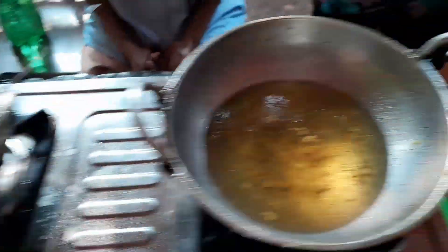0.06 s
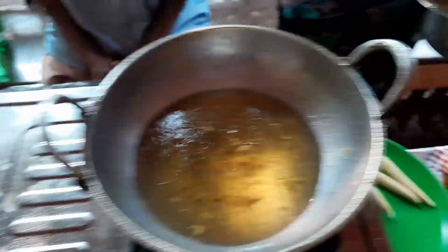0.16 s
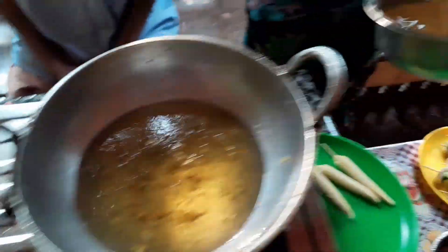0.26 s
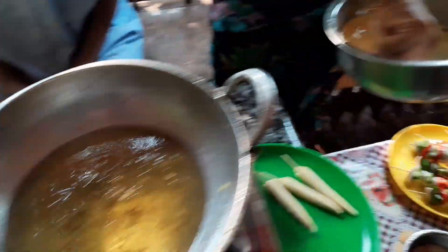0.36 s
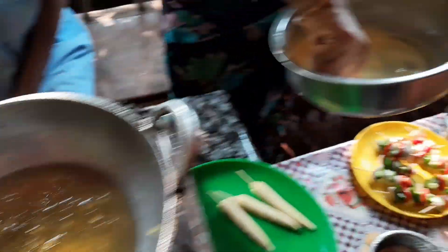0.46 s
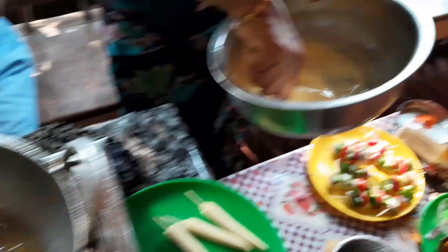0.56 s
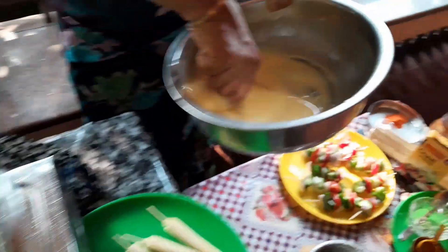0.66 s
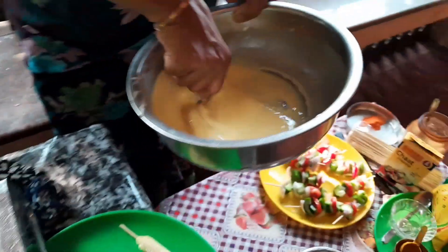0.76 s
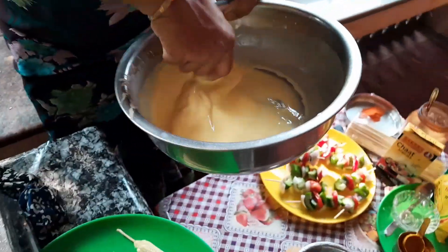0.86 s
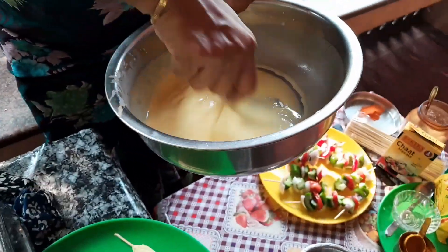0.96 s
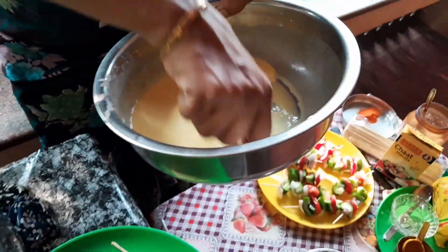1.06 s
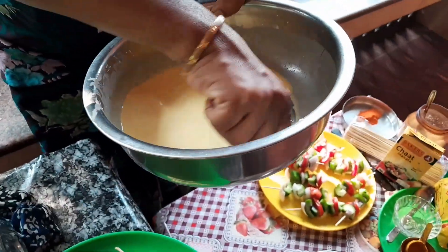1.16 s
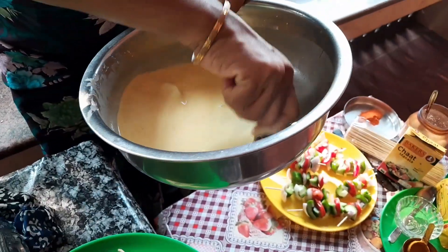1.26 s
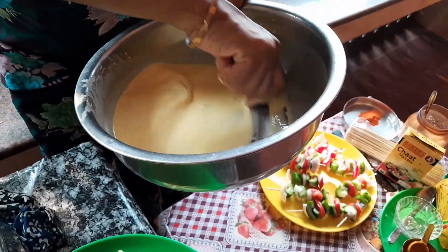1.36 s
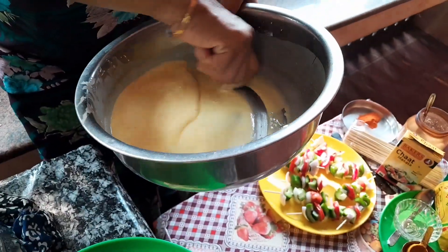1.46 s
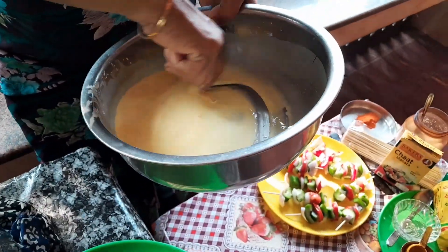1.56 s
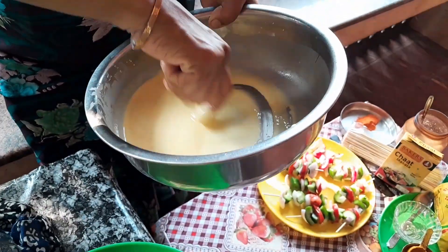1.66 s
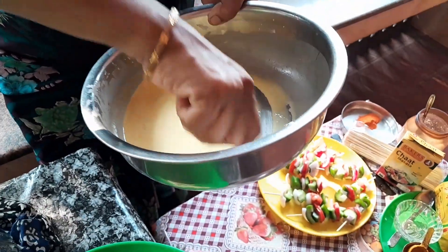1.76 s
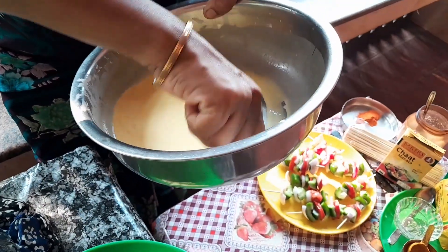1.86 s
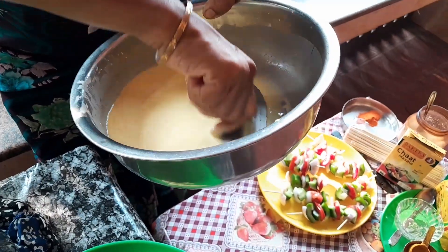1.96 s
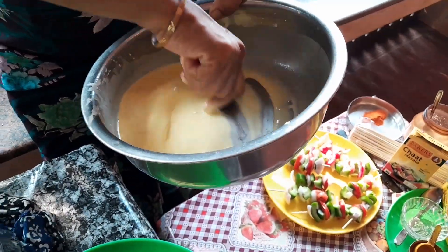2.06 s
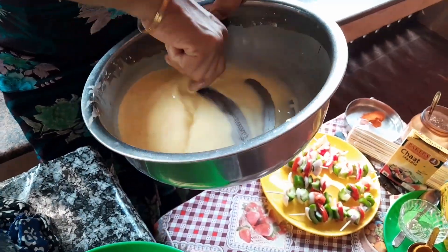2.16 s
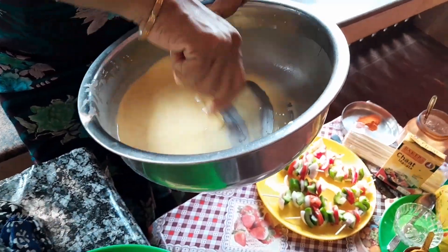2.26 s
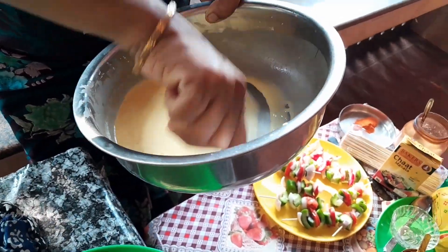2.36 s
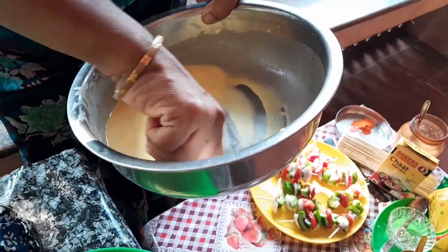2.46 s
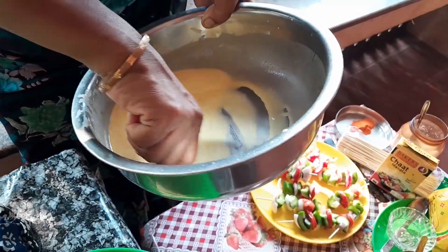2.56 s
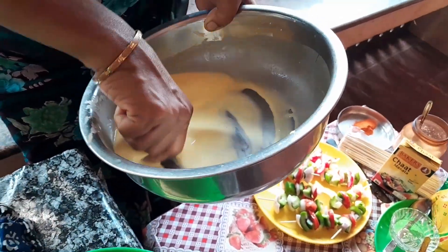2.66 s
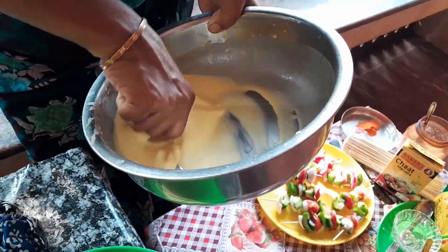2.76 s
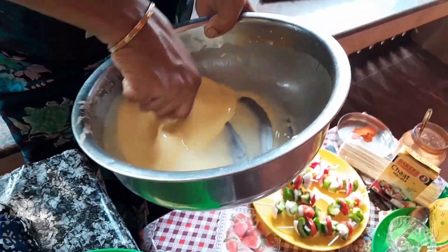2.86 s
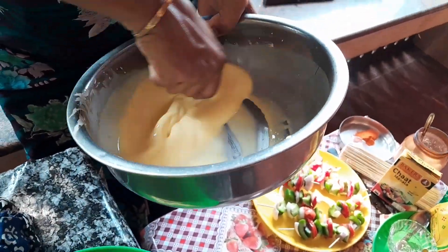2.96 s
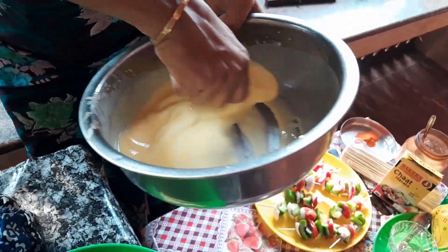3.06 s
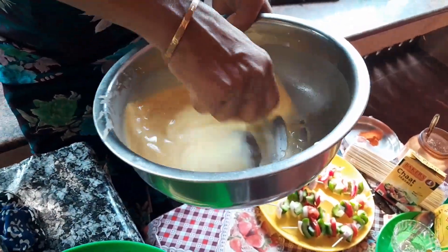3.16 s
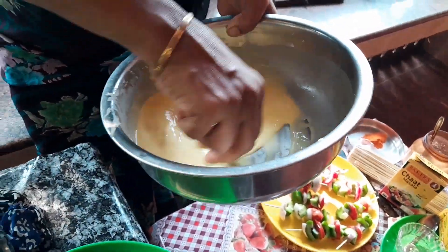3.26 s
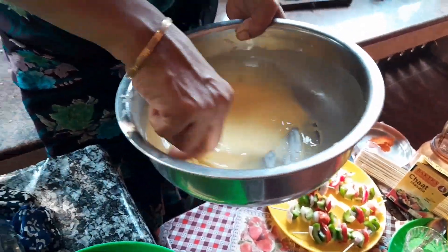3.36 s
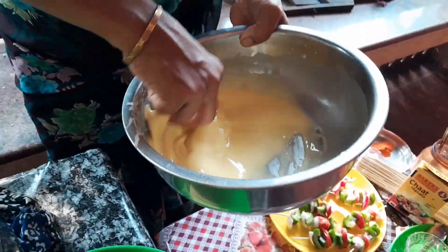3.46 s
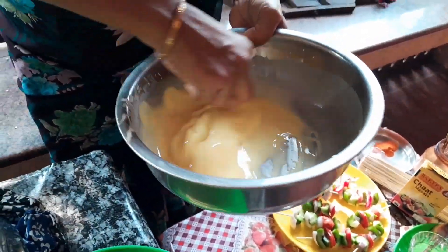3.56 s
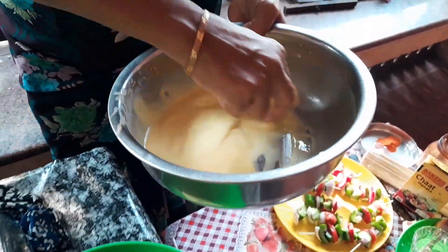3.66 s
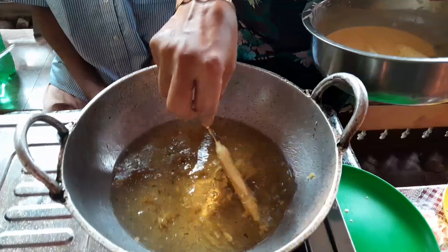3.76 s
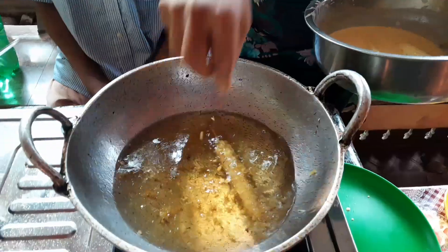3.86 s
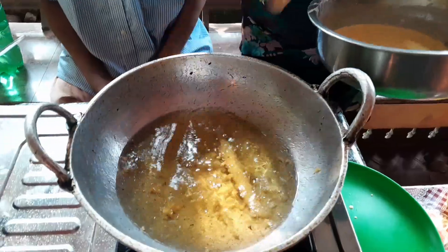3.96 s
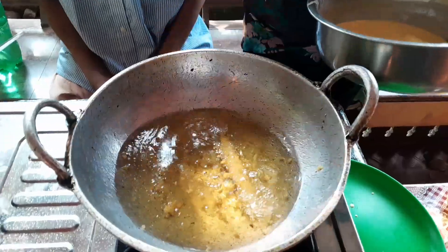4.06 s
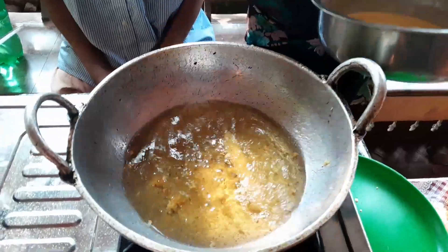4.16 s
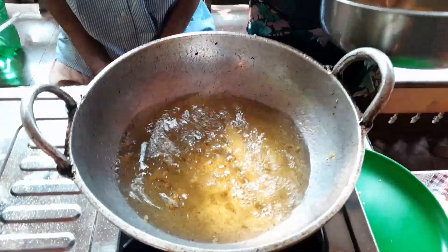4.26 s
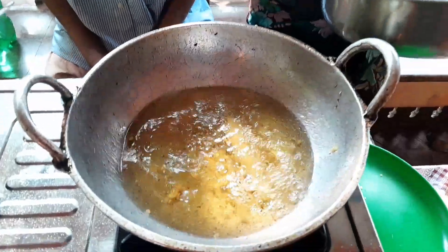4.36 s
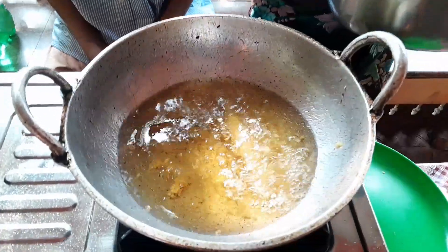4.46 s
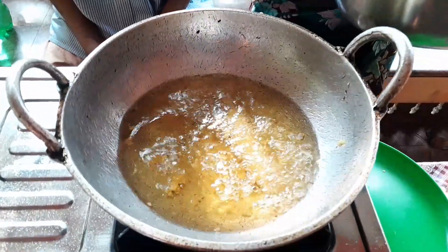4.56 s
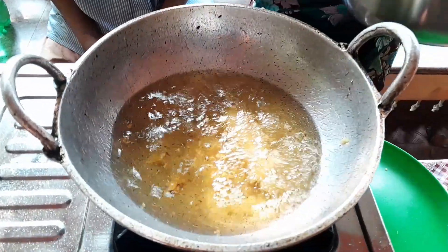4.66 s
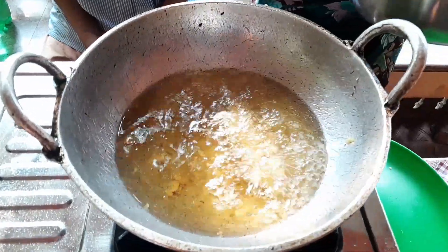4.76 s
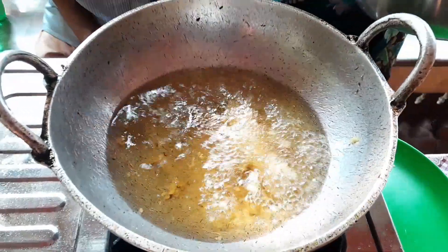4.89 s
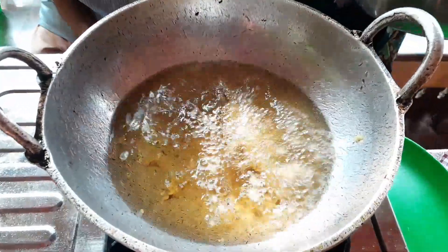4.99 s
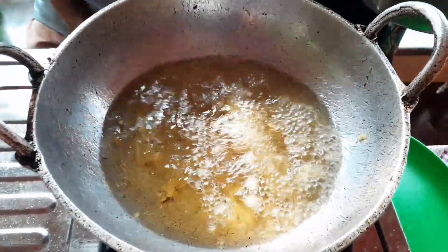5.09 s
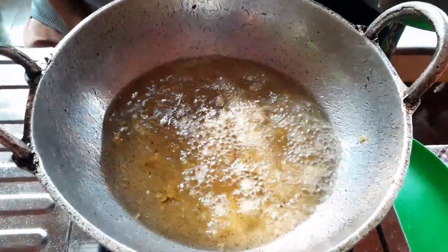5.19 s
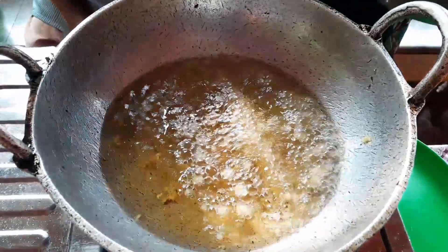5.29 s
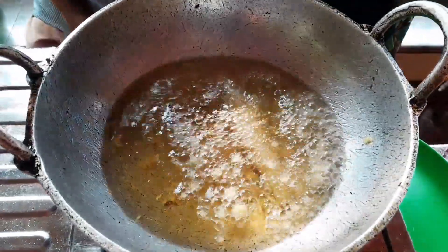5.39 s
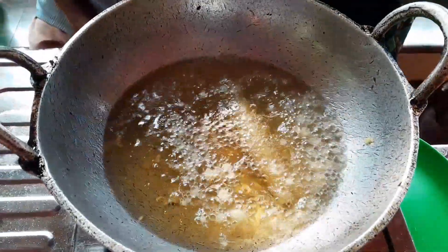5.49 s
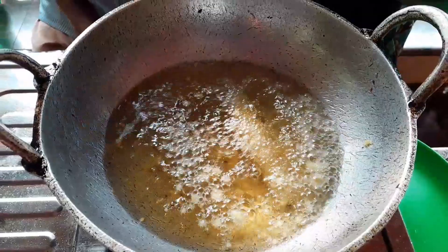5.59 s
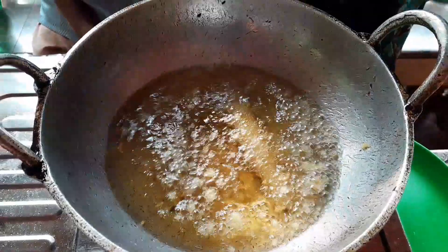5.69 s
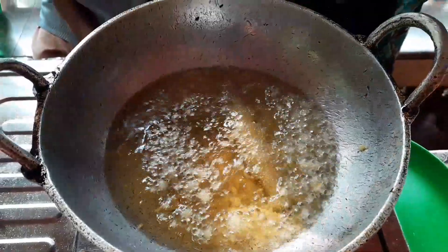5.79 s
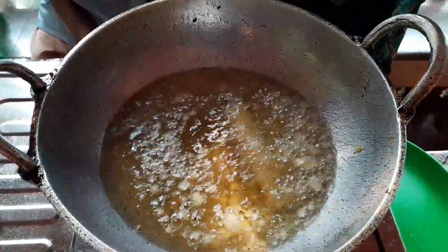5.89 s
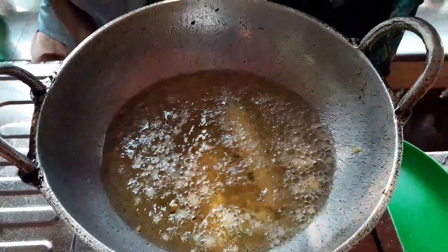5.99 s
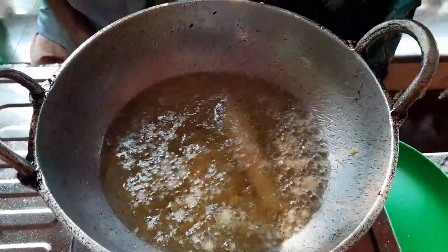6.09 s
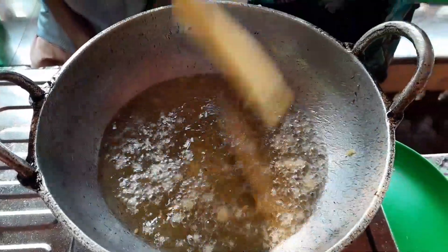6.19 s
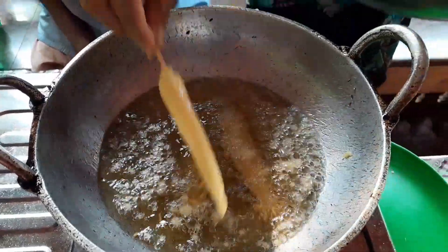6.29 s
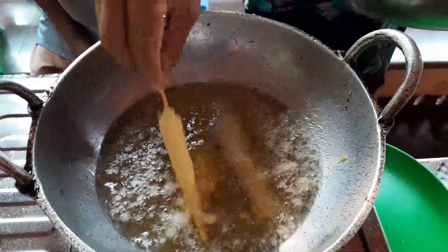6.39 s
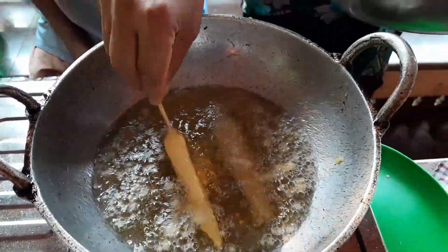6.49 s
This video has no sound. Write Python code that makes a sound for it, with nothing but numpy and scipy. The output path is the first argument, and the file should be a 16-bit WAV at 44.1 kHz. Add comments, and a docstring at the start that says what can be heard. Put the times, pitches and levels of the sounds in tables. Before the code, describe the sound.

From 0 to 3.75 seconds a home kitchen is heard with soft air noise and faint low hum. A thin, high whine jumps slightly up in pitch roughly every third of a second, sinks and swells between jumps, with a fluttering, fuzzy upper edge. Stirring batter gives short, narrow rasps near 0.7, 1.5, 2.3 and 3.1 seconds. Hot oil spits irregular, crisp pops throughout, stronger near 0.8, 1.8, 2.3 and 2.5, with brief wall reflections; a dull tap falls at 3.6. At 3.75 the whine and stirring stop and the wok is close. Food enters the oil: uneven sputters and spits until about 4, then dense fizz swells, fullest around 5.7, with hollow froth sinking in pitch and a low, surging pan drone. The sizzle eases slightly; at 6.45 one loud pop snaps out before the end at 6.5. Stereo is modestly wide, the oil nearer the left.

```python
"""A room hum and a thin leaping whine sound while batter is stirred and oil spits single pops in a wok.
A home kitchen. Then, with the microphone close to the wok, battered food goes in: the oil froths,
the fizz swells and the pan drones low. Two microphone ports a little apart, the left one nearer the oil.
Pops are short rings in snaps of noise; fizz and froth are many damped sines; whine, hum and drone are
wavering sines; air, rasp and rumble are shaped noise."""
import sys
import numpy as np
from scipy import signal
from scipy.fft import rfft, irfft, next_fast_len
from scipy.io import wavfile
from scipy.ndimage import uniform_filter1d, map_coordinates

SR = 44100
rng = np.random.default_rng(int(sys.argv[2]) if len(sys.argv) > 2 else 0)


def linear_from_db(decibels):
    """Turn decibels (scalar or array-like) into linear amplitude factors; 0 gives 1."""
    return 10 ** (np.asarray(decibels, float) / 20)


def wav_record(signal):
    """Record a signal, one row per channel, as 16-bit PCM in the file named by sys.argv[1]."""
    frames = np.transpose(np.atleast_2d(signal))
    bounded = np.clip(frames, -1, 1)
    # unit amplitude maps onto the largest positive 16-bit level
    quanta = np.round(bounded * 32767).astype(np.int16)
    wavfile.write(sys.argv[1], SR, quanta)


N = 287963
TIME = np.arange(N) / SR
CLOSE_S = 3.755  # the microphone is close to the wok: whine and stirring end, frying begins
LAG_S = 0.0004  # sound from the oil reaches the right port later
TOP_HZ = 16030  # the steady noises end here


def unit(x):
    """Scaled to rms 1."""
    return x / np.sqrt(np.mean(x ** 2) + 1e-20)


def along(points, hz):
    """Reads (frequency, value) points on a log frequency axis."""
    f, value = np.transpose(points)
    return np.interp(np.log(hz + 1), np.log(f + 1), value)


def curves(rows):
    """One value per sample for each column after the time."""
    s, *columns = np.transpose(rows)
    return [np.interp(TIME, s, column) for column in columns]


def wobble(rate):
    """A smooth random curve, rate knots a second."""
    knots = rng.standard_normal(int(N * rate / SR) + 4)
    return map_coordinates(knots, [TIME * rate])


def filtered(x, response):
    """x times a response of frequency."""
    m = next_fast_len(N + 8192)
    spectrum = rfft(x, m) * response(np.fft.rfftfreq(m, 1 / SR))
    return irfft(spectrum, m)[..., :N]


def peak(f, hz, width_hz):
    """A causal resonance."""
    return 1j * f * width_hz / (hz * hz - f * f + 1j * f * width_hz)


# How alike the room noise is at the two ports: (frequency [Hz], likeness [0-1])
ROOM_LIKENESS = [(60, 0.76), (300, 1), (700, 0.75), (1500, 0), (15000, 0.3)]


def rush(response, likeness=ROOM_LIKENESS, lag_s=0):
    """Stereo noise of rms 1, shared between ports by likeness; the right port may hear it later."""
    def turn(f):
        return np.arccos(np.clip(along(likeness, f), -1, 1)) / 2

    def mid_side(f):
        return response(f) * (f < TOP_HZ) * [np.cos(turn(f)), np.sin(turn(f))]

    mid, side = filtered(rng.standard_normal((2, N)), mid_side)
    right = np.roll(mid - side, round(lag_s * SR))
    return unit(np.array([mid + side, right]))


def patches(depth_db, x):
    """x with slow random patches of gain over time and frequency."""
    z = signal.stft(x, nperseg=512)[2]
    field = uniform_filter1d(rng.standard_normal(z.shape[1:]), size=6, axis=0)
    field = uniform_filter1d(field, size=10, axis=1)
    return signal.istft(z * linear_from_db(depth_db * unit(field)), nperseg=512)[1][:, :N]


# Colour of the room air: (frequency [Hz], level per Hz [dB])
AIR_COLOUR = [(15, -44), (30, -8.5), (70, 0.5), (160, 0), (480, -11), (900, -18.5), (1700, -21),
              (2500, -15), (3500, -23.5), (4900, -18.5), (8300, -20.5), (10700, -21.5), (14200, -24),
              (15900, -33)]


def room_air():
    """Air of the room: coloured noise with slow patches of gain."""
    level_db = -53.5 + 0.4 * wobble(3.86)
    air = rush(lambda f: linear_from_db(along(AIR_COLOUR, f)), lag_s=LAG_S)
    return linear_from_db(level_db) * patches(1.58, air)


# Low hum lines of the room: (frequency [Hz], level [dB])
HUM_LINES = [(150.5, -63), (220, -67)]


def room_hum():
    """Low sines, each wavering in pitch and level, the same at both ports."""
    hum = np.zeros(N)
    for hz, db in HUM_LINES:
        level = linear_from_db(db + 1.7 * wobble(5.17)) * np.sqrt(2)
        phase = 2 * np.pi * np.cumsum(hz + 1.506 * wobble(6)) / SR
        hum += level * np.sin(phase)
    return hum


# The swell after each leap of the whine, before the fundamental's own level:
# (top [dB], place of the top [0-1 of the way to the next leap])
SWELLS = [(-73, 0.69), (-62, 0.57), (-56.5, 0.53), (-58.5, 0.52), (-58, .45), (-57.5, 0.66), (-57, 0.65),
          (-60.5, 0.62), (-58, .55), (-57, 0.63), (-60, 0.51), (-61.5, .45)]


def swell_db(cycle):
    """Level of the whine's low harmonics: a short blip after each leap, then one rounded swell."""
    # places and widths are shares of the cycle
    swell_width, blip_db, blip_place, blip_width, least_db = 0.16, -62, 0.094, 0.073, -71.5
    index = np.clip(cycle.astype(int), 0, len(SWELLS) - 1)
    top_db, place = np.array(SWELLS)[index].T
    way = cycle % 1
    swell = linear_from_db(top_db) * np.exp(-((way - place) / swell_width) ** 2 / 2)
    blip = linear_from_db(blip_db) * np.exp(-((way - blip_place) / blip_width) ** 2 / 2)
    return 20 * np.log10(uniform_filter1d(swell + blip, size=400) + linear_from_db(least_db))


# Moments at which the whine leaps up in pitch, to sink again: time [s]
WHINE_LEAPS = [-.19, .16, .51, .84, 1.19, 1.55, 1.88, 2.22, 2.57, 2.89, 3.23, 3.55, 3.9]
# Harmonics of the whine: (multiple of the fundamental, level [dB] over the swell for 1-3 and over
# the high harmonics' common level from 4 up, lead of the left port [rad])
WHINE_HARMONICS = [(1, -1.7, 0.45), (2, -8.5, 1.7), (3, -26, 1.2), (4, -0.2, 1.8), (5, -23, 1.3),
                   (6, -25, 1.4)]


def whine():
    """A thin tone sinking after each leap; its high harmonics flutter, with fuzz about the fourth."""
    cycle = np.interp(TIME, WHINE_LEAPS, np.arange(len(WHINE_LEAPS)))
    sunk = cycle % 1
    hz = 2398 - 46 * sunk + 4 * wobble(12) + 3.5 * wobble(90)
    phase = 2 * np.pi * np.cumsum(hz) / SR
    flutter = 2 * np.pi * np.cumsum(305 + 25 * wobble(20)) / SR
    low_db = swell_db(cycle) + 0.93 * wobble(14)
    # the high harmonics yield a little as the low ones swell
    high_db = -56 + 0.5 * wobble(16) - 0.13 * (low_db - low_db.mean())
    tone = np.zeros((2, N))
    for multiple, db, lead in WHINE_HARMONICS:
        is_high = multiple > 3
        shared_db = db + (high_db if is_high else low_db) + 3.9 * wobble(35.01)
        port_db = 0.85 * np.array([wobble(9.4), wobble(6.4)])
        level = linear_from_db(shared_db + port_db)
        if is_high:
            level *= 1 + 0.26 * linear_from_db(1.9 * wobble(13)) * np.sin(flutter)  # a sideband each side
        tone += np.sqrt(2) * level * np.sin(multiple * phase + [[lead], [0]])
    fuzz = linear_from_db(-57 + 3.4 * wobble(40)) * rush(lambda f: peak(f, 9420, 410) ** 2)
    return (tone + fuzz) * (TIME < CLOSE_S)


# Stirring strokes: (start time [s], end time [s], rasp level [dB])
STROKES = [(-0.2, -0.045, -59), (0.647, 0.826, -61.5), (1.43, 1.64, -60.5), (2.257, 2.445, -62.5),
           (3.07, 3.274, -61.5)]


def stroke_db():
    """Each stroke's rasp rises, holds and dies away."""
    rise_db_per_s, fall_db_per_s = 96, 87
    start, end, db = np.transpose(STROKES)[:, :, None]
    before = rise_db_per_s * np.maximum(start - TIME, 0)
    after = fall_db_per_s * np.maximum(TIME - end, 0)
    return (db - before - after).max(axis=0)


def stirring():
    """Stirred batter: a narrow resonance of noise rasps with each stroke."""
    level_db = stroke_db() + 0.6 * wobble(11) + 1.8 * wobble(39.82)
    rasp = rush(lambda f: peak(f, 1180, 116) ** 2)
    return linear_from_db(level_db) * rasp * (TIME < CLOSE_S)


def fade(t, life):
    """A very quick rise and a short decay."""
    return np.exp(-(t / life) ** 1.15) * (1 - np.exp(-(t / 0.00018) ** 2))


def spit(t):
    """A tick of treble noise."""
    treble = signal.butter(4, 9500, "high", fs=SR, output="sos")
    return signal.sosfilt(treble, rng.standard_normal(len(t)) * fade(t, 0.0017))


# Decay of the kitchen's tail: (frequency [Hz], time to fall 60 dB [s])
WALL_DECAY = [(500, 0.06), (3000, 0.35), (8000, 0.22), (15000, 0.019)]


def walls(x, echo_s, length_s):
    """The kitchen's answer: a diffuse decaying tail that gathers at the first wall's echo."""
    hz, t, z = signal.stft(rng.standard_normal(int(length_s * SR)), SR, nperseg=256)
    decay = linear_from_db(-60 * t / along(WALL_DECAY, hz)[:, None])
    tail = signal.istft(z * decay, SR, nperseg=256)[1]
    t = np.arange(len(tail)) / SR
    tail = tail * (1 + 0.99 * np.exp(-((t - echo_s) / 0.0035) ** 2))
    return signal.fftconvolve(x, tail / np.linalg.norm(tail))


def add(track, s, burst):
    """Puts a burst and the walls' answer to it on one port's track."""
    answer = walls(burst[:SR // 50], echo_s=0.016, length_s=0.2)
    answer = linear_from_db(-10.5) * answer[:len(burst)]
    at = round(s * SR)
    track[at:at + len(burst)] += burst
    track[at:at + len(answer)] += answer


# Single pops: (time [s], level [dB] before the port's gain, low ring [Hz], high ring [Hz],
# share of the high ring [0-1])
OIL_POPS = [(0.2616, -28, 3430, 4000, 0.4), (0.4318, -25.5, 2200, 6900, 0.53),
            (0.4993, -30.5, 3600, 5200, 1), (0.626, -33.5, 4650, 5550, 1), (0.8213, -23, 4650, 6930, 0.88),
            (0.8445, -29, 3860, 5640, .95), (0.8913, -26, 2880, 4150, 1), (1.063, -30, 5670, 6970, 0.83),
            (1.263, -34.5, 2460, 4700, 0.7), (1.338, -37.5, 4200, 4700, 0.9),
            (1.3655, -24.5, 2620, 5170, 0.45), (1.4136, -31.5, 6000, 7800, .95),
            (1.5419, -28, 1560, 4040, .75), (1.5638, -38, 5000, 7040, 0.9), (1.5992, -27, 2400, 4730, 0.6),
            (1.7787, -39, 2200, 3870, 0.7), (1.796, -32.5, 1930, 4340, 0.3),
            (1.8167, -20.5, 4000, 4900, 0.86), (2.0325, -36.5, 2330, 4240, 0.9),
            (2.16, -35.5, 5600, 7040, .95), (2.2755, -21.5, 2560, 5670, 0),
            (2.374, -30.5, 3360, 4930, 0.63), (2.5483, -20, 3150, 4900, .28),
            (2.599, -26.5, 3750, 4100, .05), (2.759, -36.5, 4000, 4950, .95),
            (2.781, -33, 2460, 5500, 0.88), (2.804, -35, 4500, 5570, .95), (2.836, -36, 6200, 9000, .95),
            (2.917, -39.5, 2500, 4970, .95), (3.0433, -31, 4830, 7000, 1), (3.106, -23, 4000, 5140, 1),
            (3.364, -26, 4100, 5340, 1), (3.53, -30.5, 2640, 4400, 0.9), (3.5397, -24.5, 2570, 4400, 1),
            (3.558, -30, 4300, 6000, 0.8), (3.586, -36, 5000, 7700, .7), (3.7192, -21.5, 3770, 8500, 0.2),
            (3.7942, -32, 2670, 5150, 0.93), (3.854, -26.5, 1470, 5400, 0.74),
            (3.909, -25.5, 3800, 5300, 0.56), (3.962, -31, 2210, 8540, .95), (6.4446, -12, 3470, 7500, 1)]
# Faint rings of the wok after a pop: (frequency [Hz], level against the pop [dB], time to fall 60 dB [s])
WOK_RINGS = [(1620, -38.5, .25), (1910, -37, .3), (3410, -36, .15), (3870, -38, .12)]
# Gain of a pop at the left and the right port: level [dB]
PORT_GAINS = [3, 1.4]
# Delay of the oil's sound at the left and the right port: time [s]
PORT_LAGS = [0, LAG_S]


def pops():
    """A water pocket bursts: two short rings in a snap of noise; the wok rings faintly, the walls answer."""
    out = np.zeros((2, N + SR))
    t = np.arange(SR // 4) / SR
    low_life, high_life, snap_life = 0.0021, 0.0013, 0.001  # s
    for s, db, low_hz, high_hz, share in OIL_POPS:
        share = np.clip(share, 0.05, 0.97)  # what the high ring takes, the low ring loses
        body = signal.butter(3, [0.83 * low_hz, 1.346 * high_hz], "band", fs=SR, output="sos")
        metal = np.zeros(len(t))
        for hz, level_db, t60 in WOK_RINGS:
            metal += linear_from_db(level_db + rng.normal(0, 4.0) - 60 * t / t60) * np.sin(2 * np.pi * hz * t)
        phase = rng.uniform(0, 2 * np.pi, 2)
        for port, (gain_db, lag) in enumerate(zip(PORT_GAINS, PORT_LAGS)):
            # the rings stay roughly in step at both ports
            port_phase = (phase + rng.normal(0, 0.74, 2))[:, None]
            low, high = np.sin(2 * np.pi * np.outer([low_hz, high_hz], t) + port_phase)
            rings = np.sqrt(1 - share ** 2) * low * fade(t, low_life) + share * high * fade(t, high_life)
            snap = signal.sosfilt(body, rng.standard_normal(len(t)) * fade(t, snap_life))
            burst = rings + 1.44 * snap
            burst = burst / np.abs(burst).max() + linear_from_db(-33) * spit(t) + metal
            add(out[port], s + lag, linear_from_db(db + gain_db) * burst)
    return out[:, :N]


# Sharp treble spits of flying droplets: (time [s], level [dB] of the noise before its high-pass)
DROPLET_SPITS = [(0.8215, -20), (0.8448, -30), (1.817, -28), (2.834, -41), (3.105, -38), (3.787, -37),
                 (3.854, -39), (3.927, -32), (3.942, -37), (4.0, -26), (4.014, -30), (4.041, -25),
                 (3.962, -21.5), (6.4446, -31)]


def spits():
    """Flying droplets: ticks of treble noise, later at the right port, answered by the walls."""
    out = np.zeros((2, N + SR))
    t = np.arange(SR // 4) / SR
    for s, db in DROPLET_SPITS:
        for port, lag in enumerate(PORT_LAGS):
            add(out[port], s + lag, linear_from_db(db) * spit(t))
    return out[:, :N]


# Dull taps: (time [s], peak level [dB])
TAPS = [(0.822, -36), (3.617, -32.5)]


def knocks():
    """One short low push each, the same at both ports."""
    out = np.zeros(N)
    for s, db in TAPS:
        u = np.clip(TIME - s, 0, 1) / 0.00033
        push = u * np.exp(-u) * (1 - 0.19 * u)
        out += linear_from_db(db) * push / push.max()
    return out


def bubbles(count, low_hz, high_hz, cycles, scatter_db, lag_s, spread_s):
    """Bursting bubbles: damped sines, each reaching the right port later by its own place in the oil."""
    u = rng.random((count, 4))
    k = np.arange(200)
    hz = low_hz * (high_hz / low_hz) ** u[:, :1]
    turns = hz * k / SR
    size_db = scatter_db * np.clip(rng.standard_normal((count, 1)), -2.5, 2.5)
    grain = linear_from_db(size_db) * np.sqrt(hz) * np.exp(-turns / cycles) * np.sin(2 * np.pi * turns)
    start = (CLOSE_S + u[:, 1] * (N / SR - CLOSE_S)) * SR
    late = (lag_s + spread_s * 2 * (u[:, 2] + u[:, 3] - 1)) * SR
    ports = []
    for delay in (0, late):
        at = (start + delay).astype(int)[:, None] + k
        ports.append(np.bincount(at.ravel(), grain.ravel(), N + SR)[:N])
    return np.array(ports)


# How alike the oil's noise is at the two ports: (frequency [Hz], likeness [0-1])
OIL_LIKENESS = [(60, 1), (300, 1), (700, 1), (1500, 0.067), (3000, 0.094), (15000, 0.059)]
# Course of the fizz: (time [s], level [dB] before the lifts, lift of the lower band [dB],
# lift of the upper band [dB])
FIZZ_COURSE = [(3.755, -55, -10, -8), (3.84, -42.5, -0.5, 3.5), (3.88, -48.5, 3, 0), (3.94, -42.5, 3, 0.5),
               (4.09, -37.5, 1.5, -4), (4.39, -32.5, -1, 1.5), (4.8, -31.5, 2.5, 1), (4.9, -29, 2.5, -3),
               (5.32, -26, 1.5, -1.5), (5.68, -25, -1.5, -1.5), (6.53, -28, -2, 0.7)]
# Colour of the fizz: (frequency [Hz], level per Hz [dB])
FIZZ_COLOUR = [(200, -32), (380, -10), (450, -14), (620, -3.5), (740, -9.5), (1000, -3.5), (1400, -3.5),
               (1800, -8), (2600, -4.5), (5000, -2), (7200, -1.5), (10400, -10), (13000, -4.5),
               (15900, -12.5)]
# Balance of the fizz between the ports: (frequency [Hz], left over right [dB])
PORT_BALANCE = [(60, 2), (99, -15), (160, 4), (270, 1), (450, 0), (740, 9.5), (1220, 4.5), (2010, 6.5),
                (3330, 1), (5500, -1.5), (9080, 6), (15000, -3)]


def fizz():
    """Dense small bubbles burst all over the oil, some crackling, the farther ones blurred to a hiss."""
    fizz_db, lower_db, upper_db = curves(FIZZ_COURSE)
    # uneven bursts at first, evening out
    sputter_db = 3 * np.exp(-np.abs(TIME - CLOSE_S) / 0.33) * wobble(80)

    def colour(f):
        half_balance = np.array([[0.5], [-0.5]]) * along(PORT_BALANCE, f)
        return linear_from_db(along(FIZZ_COLOUR, f) + half_balance) * (f < TOP_HZ)

    small = bubbles(count=18000, low_hz=284, high_hz=17700, cycles=1.94, scatter_db=1.0,
                    lag_s=LAG_S, spread_s=0.00015)
    small = unit(filtered(small, lambda f: np.sqrt(f)))  # evens out the energy per Hz
    crackle = unit(bubbles(count=2400, low_hz=4000, high_hz=14900, cycles=0.29, scatter_db=1.0,
                           lag_s=LAG_S, spread_s=0.0002))
    hiss = patches(3.15, rush(lambda f: f > 0, OIL_LIKENESS, lag_s=LAG_S / 2))
    spray = unit(filtered(small + 0.55 * crackle + 1.1 * hiss, colour))
    lower = filtered(spray, lambda f: 1 / (1 + (f / 2300) ** 4))
    upper = filtered(spray, lambda f: 1 - 1 / (1 + (f / 8500) ** 8))
    tilted = spray + (linear_from_db(lower_db) - 1) * lower + (linear_from_db(upper_db) - 1) * upper
    level = linear_from_db(fizz_db + sputter_db + 0.28 * wobble(4.6) + 0.42 * wobble(30))
    return level * tilted * (TIME >= CLOSE_S)


def froth():
    """Larger bubbles through one resonance, shifted up in pitch at first, louder at the left port."""
    large = bubbles(count=1500, low_hz=366, high_hz=1380, cycles=1.0, scatter_db=1.5,
                    lag_s=LAG_S / 2, spread_s=0.0001)
    note = unit(filtered(large, lambda f: peak(f, 634, 90)))
    raised_hz = 230 * np.exp(-np.clip(TIME - 3.95, 0, 9) / 0.3)  # the note sinks as the foam thickens
    shift = np.exp(2j * np.pi * np.cumsum(raised_hz) / SR)
    return np.real(signal.hilbert(note) * shift) * linear_from_db([[1.8], [-1.8]])


def drone():
    """The boiling shakes the pan: one low sine wavering in pitch and level."""
    phase = 2 * np.pi * np.cumsum(53.0 + 2.46 * wobble(9)) / SR
    return np.sqrt(2) * np.sin(phase) * linear_from_db(0.92 * wobble(21.13))


# Colour of the pan's rumble: (frequency [Hz], level per Hz [dB])
RUMBLE_COLOUR = [(30, -4.5), (70, 1.5), (105, 1.5), (130, -10.5), (220, -3.5), (300, -11), (500, -14),
                 (900, -60)]


def rumble():
    """Low coloured noise under the drone, wavering in level."""
    noise = rush(lambda f: linear_from_db(along(RUMBLE_COLOUR, f)), OIL_LIKENESS)
    return linear_from_db(-49.5 + 3.7 * wobble(6)) * noise


# Course of the boil before its surges: (time [s], froth level [dB], drone level [dB])
BOIL_COURSE = [(3.755, -87, -46), (3.93, -70, -50), (3.99, -52, -48.5), (4.36, -45.5, -43),
               (4.7, -47, -41.5), (4.95, -47.5, -48), (5.4, -50, -40.5), (5.8, -48, -49), (6.2, -52.5, -48),
               (6.4, -50, -62), (6.53, -59, -62)]


def boil():
    """Froth and drone come in surges over the rumble."""
    froth_db, drone_db = curves(BOIL_COURSE)
    froth_db = froth_db + 2.05 * wobble(13)
    drone_db = drone_db + 2.1 * wobble(8.7)
    mix = linear_from_db(froth_db) * froth() + linear_from_db(drone_db) * drone() + rumble()
    return mix * (TIME >= CLOSE_S)


def scene():
    """All sources at the two ports."""
    kitchen = room_air() + room_hum() + whine() + stirring()
    frying = fizz() + boil()
    return kitchen + pops() + spits() + knocks() + frying


def low_pass(x):
    """Removes everything above the highest recorded frequency."""
    return signal.sosfilt(signal.butter(12, 16970, fs=SR, output="sos"), x)


def record(dry):
    """The finished mix of both ports as it is stored."""
    return low_pass(dry)


dry = scene()
out = record(dry)
wav_record(out)
```